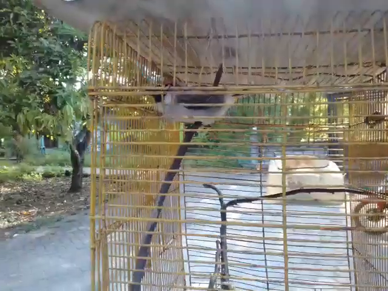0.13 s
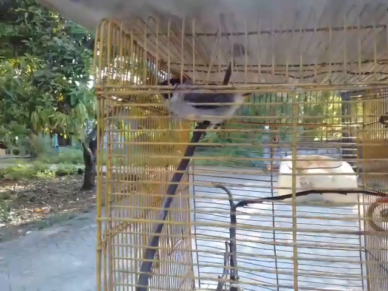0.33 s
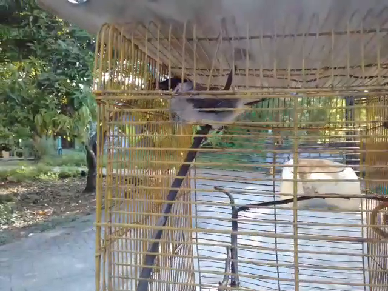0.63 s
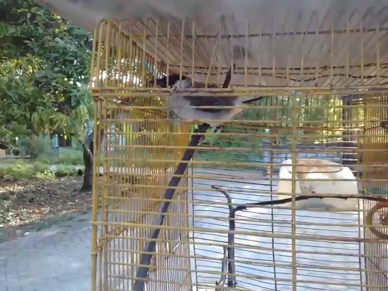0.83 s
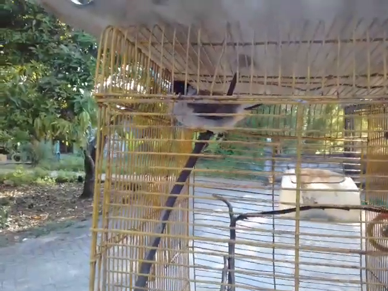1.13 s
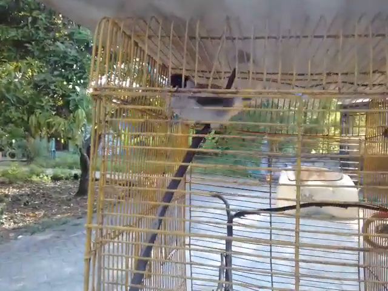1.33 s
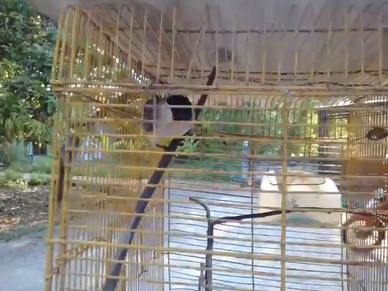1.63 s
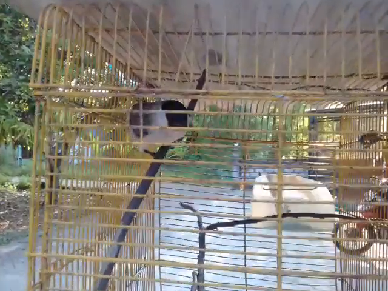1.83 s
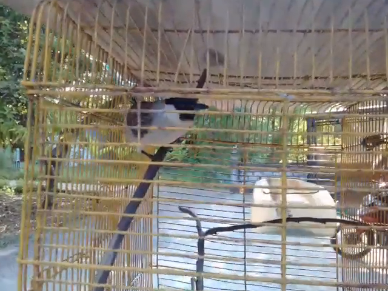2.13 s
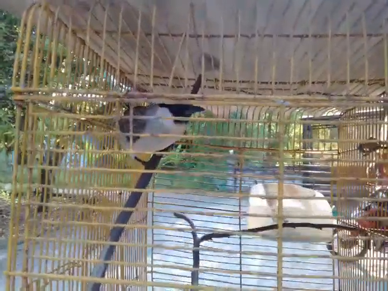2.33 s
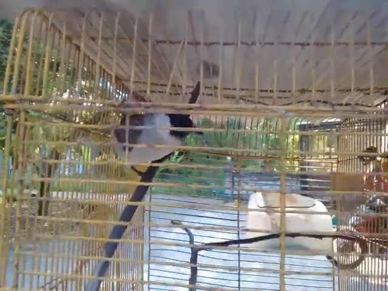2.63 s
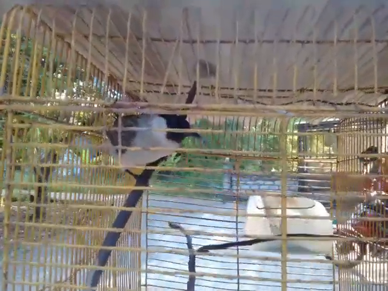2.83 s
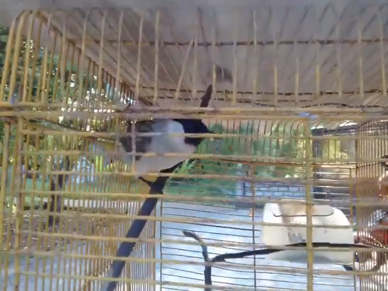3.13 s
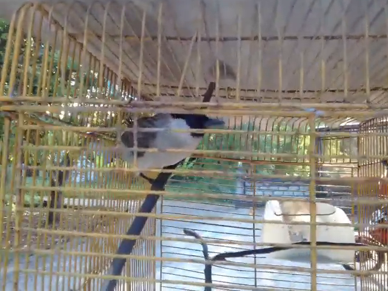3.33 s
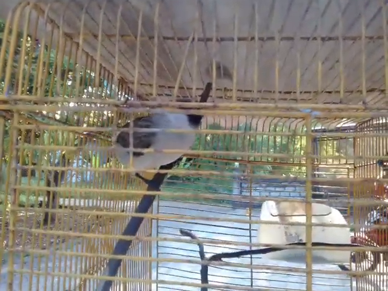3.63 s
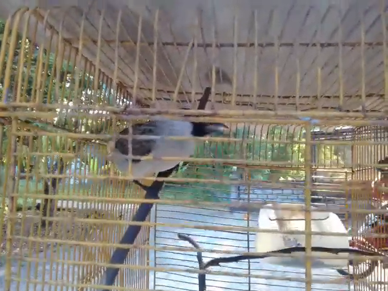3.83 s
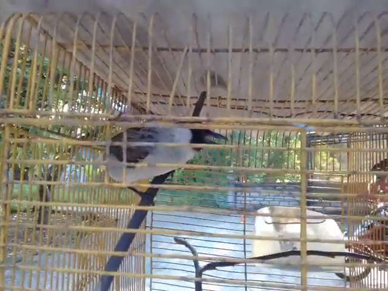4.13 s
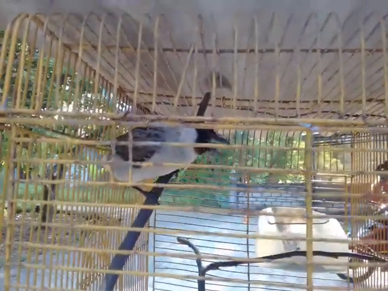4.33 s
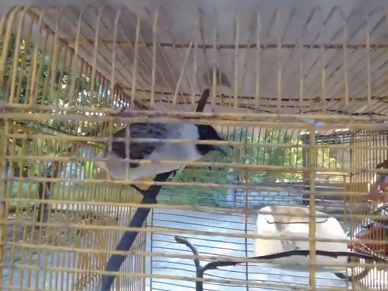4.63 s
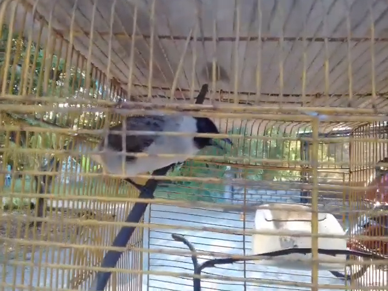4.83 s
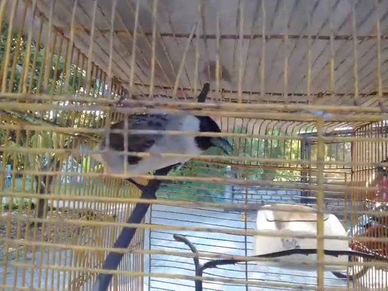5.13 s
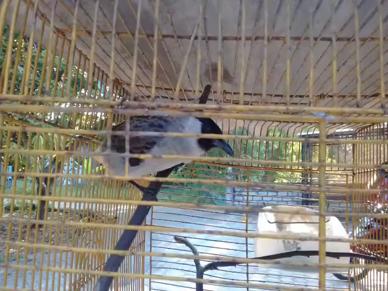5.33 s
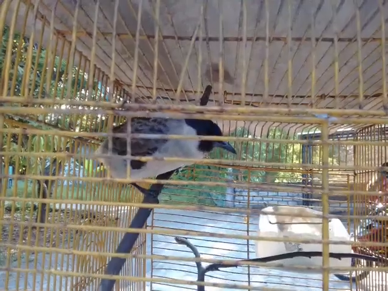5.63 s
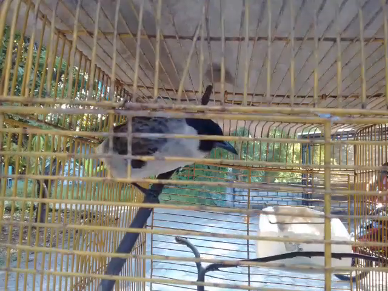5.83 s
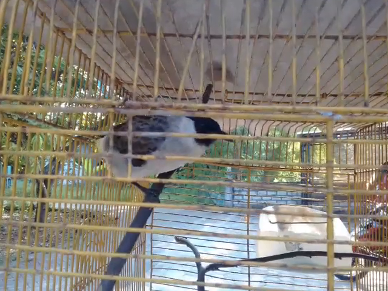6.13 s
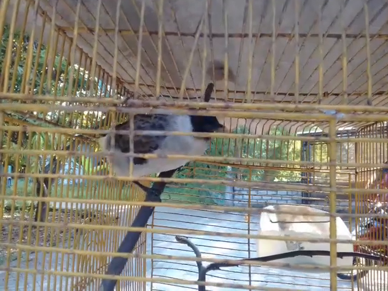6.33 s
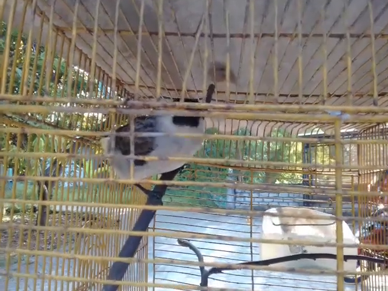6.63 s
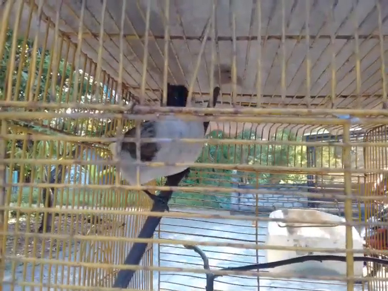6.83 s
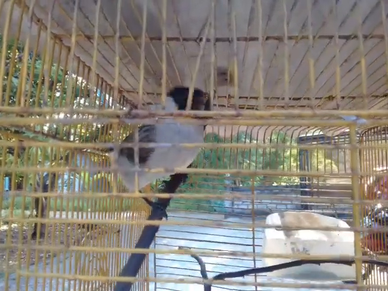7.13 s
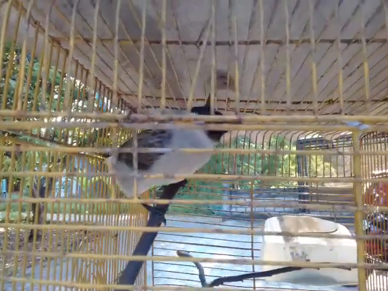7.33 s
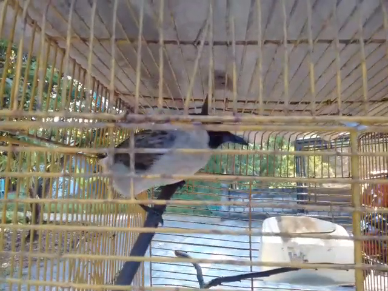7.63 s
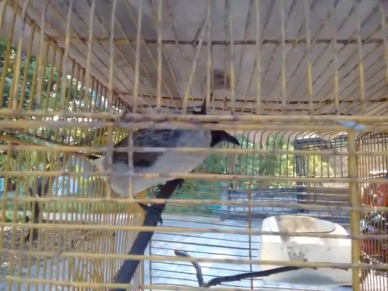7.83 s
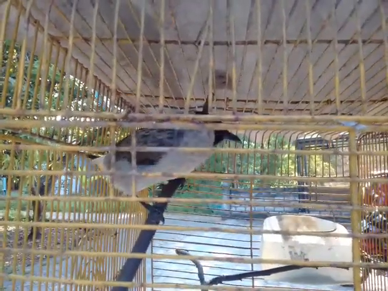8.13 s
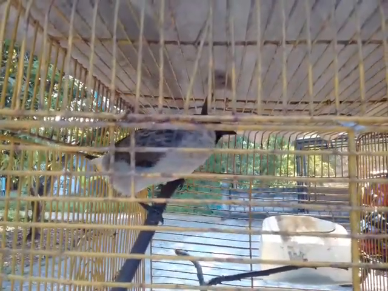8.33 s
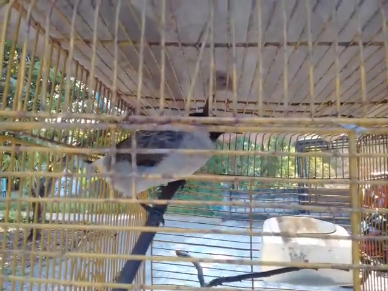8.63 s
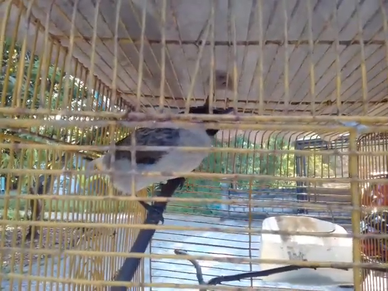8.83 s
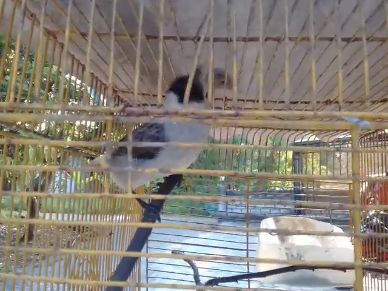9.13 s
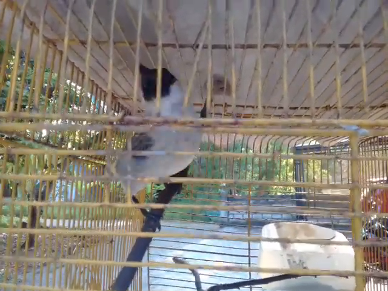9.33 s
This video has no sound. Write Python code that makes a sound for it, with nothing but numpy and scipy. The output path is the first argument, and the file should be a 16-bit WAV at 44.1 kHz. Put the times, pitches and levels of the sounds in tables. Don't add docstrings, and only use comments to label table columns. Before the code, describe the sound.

After a brief silence, a nearby caged songbird gives one soft phrase: chip, raspy warble, sliding whistle, then a leaping, falling note. Claws tick on the perch and feathers swish while far birds call. Then four loud phrases ring out in quick succession. Hops, wire pings and a quieter phrase follow, with one last soft phrase at the end. Porch and garden give a short echo; a small bright microphone adds hiss.

```python
import sys
import numpy as np
from scipy import signal
from scipy.fft import rfft, irfft, next_fast_len
from scipy.io import wavfile
from scipy.ndimage import uniform_filter1d, minimum_filter1d, map_coordinates

SR = 44100
rng = np.random.default_rng(int(sys.argv[2]) if len(sys.argv) > 2 else 0)


def persist_wave(psi):
    counts = np.round(np.clip(psi, -1, 1) * 32767).astype(np.int16)
    wavfile.write(sys.argv[1], SR, np.atleast_2d(counts).T)


def invert_db(x):
    u = np.asarray(x, float) / 20
    return 10 ** u


N = 418509

# frequency_hz, density_db
HISS_SPECTRUM = [(3530, -11), (6000, -22.5), (6710, -12), (8870, -10.5), (10700, 3.5), (11200, -1),
                 (13200, -21.5), (14400, -17), (15600, -31.5)]


def unit(x):
    return x / np.sqrt(np.mean(x ** 2) + 1e-20)


def along(points, hz):
    f, v = np.transpose(points)
    return np.interp(np.log(hz + 1), np.log(f + 1), v)


def curves(rows, smooth_s=0):
    s, *columns = np.transpose(rows)
    t = np.arange(N) / SR
    width = max(1, int(smooth_s * SR))
    return [uniform_filter1d(np.interp(t, s, column), width) for column in columns]


def wobble(rate):
    knots = rng.standard_normal(int(N * rate / SR) + 4)
    return map_coordinates(knots, [np.arange(N) * rate / SR])


def coloured(size, gain):
    m = next_fast_len(size + 2048)
    spectrum = rfft(rng.standard_normal(m)) * gain(np.fft.rfftfreq(m, 1 / SR))
    return unit(irfft(spectrum, m)[:size])


def closed(spectrum):
    return lambda hz: invert_db(along(spectrum, hz)) * (hz > spectrum[0][0] / 2)


def add(track, s, x):
    part = track[round(s * SR):][:len(x)]
    part += x[:len(part)]


def echo(x, stretch, onset):
    # frequency_hz, t60_s
    yard_decay = [(500, 0.49), (3000, 0.47), (8000, 0.31), (14000, 0.1)]
    out, hop = np.zeros(N), SR // 4
    for start in range(0, N, hop):
        hz, t, z = signal.stft(rng.standard_normal(SR // 2), SR, nperseg=256)
        t60 = stretch * along(yard_decay, hz)[:, None]
        tail = signal.istft(z * invert_db(-60 * t / t60), SR, nperseg=256)[1]
        tail = tail / np.linalg.norm(tail)
        add(out, start / SR + onset, signal.fftconvolve(x[start:start + hop], tail))
    return out


def air():
    # frequency_hz, density_db
    traffic_spectrum = [(15, -40), (25, -8), (33, -38), (64, -10), (166, -1), (375, -7.5), (500, -7.5),
                        (650, -28), (1100, -120)]
    # frequency_hz, density_db
    garden_spectrum = [(210, -32), (350, -10.5), (447, -4.5), (571, -1.5), (3570, -4), (5150, -14),
                       (6500, -17.5), (8450, -35.5), (14300, -120)]
    # time_s, level_db
    breeze = [(.4, -13), (.7, -0.5), (1.64, 3), (1.7, -1), (3.3, -0.9), (4.2, 1), (5.0, -2.5), (5.7, -5),
              (6.6, 1), (7.2, 3), (8.6, 4), (9.49, 6)]
    # time_s, level_db
    traffic_loudness = [(.4, -8), (.7, 8.5), (1.64, 10), (1.7, 1), (3.3, 2), (4.2, 1), (5.7, -2), (7.5, 4),
                        (9.49, 5.5)]
    traffic_db, garden_db, hiss_db = -67.5, -55, -53.5
    sway_db = 1.5
    breeze_db, = curves(breeze)
    traffic = invert_db(traffic_db + curves(traffic_loudness)[0] + 1.7 * wobble(4.1)) * coloured(N, closed(traffic_spectrum))
    garden = invert_db(garden_db + breeze_db + sway_db * wobble(8)) * coloured(N, closed(garden_spectrum))
    hiss_level = invert_db(hiss_db + 0.68 * breeze_db + 1.2 * wobble(18))
    return traffic + garden + hiss_level * coloured(N, closed(HISS_SPECTRUM))


def engine():
    # frequency_hz, width_hz, level_db
    engine_lines = [(190, 8, 5), (400, 12, -1), (562, 22, 5)]
    # time_s, level_db
    idle = [(.4, -102), (1.2, -58.5), (1.65, -72), (2.3, -72), (3.0, -76), (7.6, -82.5), (8.3, -62),
            (9.49, -61.5)]

    def resonances(f):
        return sum(invert_db(db) / (1 + (2 * (f - hz) / width_hz) ** 2) for hz, width_hz, db in engine_lines)

    lines = coloured(N, resonances)
    return invert_db(curves(idle)[0]) * lines


def warble(shy_db, *dips_hz):
    start_s, swing_s = -.0478, .0125
    entry_hz, crest_hz, first_dip_hz, sink_hz = 4500, 3760, 3000, 220
    crest_db, dip_db, crest_bright_db, dip_bright_db = -12, -13, -44, -23
    rows = [(start_s + 0.2 * swing_s, entry_hz + 900, crest_db - 24 + shy_db, crest_bright_db - 14),
            (start_s + 0.4 * swing_s, entry_hz - 250, crest_db - 2 + shy_db, crest_bright_db)]
    for k, dip_hz in enumerate((first_dip_hz,) + dips_hz):
        dip_s = start_s + (0.78 + k) * swing_s
        this_crest_hz = crest_hz - 150 * (k == 1)
        this_dip_db = dip_db + shy_db * (k == 0) - 2.5 * (k == 2)
        rows += [(dip_s + at * swing_s, dip_hz, this_dip_db, dip_bright_db) for at in (-.05, .06)]
        rows += [(dip_s + at * swing_s, this_crest_hz, crest_db, crest_bright_db) for at in (.44, .62)]
    return rows + [(-.003, crest_hz - sink_hz, crest_db - 3, crest_bright_db)]


def glide(start_db, place, end_db):
    # time_s, pitch_hz, tone_db, overtones_db
    whistle = [(0, 3878, -10.5, -41), (.006, 3947, -11, -33), (.02, 3894, -9.5, -44.5),
               (.035, 3790, -4.5, -30), (.048, 3710, -9.5, -42), (.054, 3680, -26.5, -53),
               (.057, 3680, -55.5, -72)]
    peak_s = whistle[3][0]
    rows = []
    for s, hz, db, bright_db in whistle:
        if s <= peak_s:
            rows.append((s * place, hz, db + start_db * (1 - s / peak_s), bright_db))
        else:
            rows.append((s, hz, db + end_db, bright_db))
    return rows


def phrases():
    # time_s from the beat, pitch_hz, tone_db, overtones_db
    lead_in = [(-.113, 4328, -42.5, -38.5), (-.109, 4326, -40.5, -34), (-.093, 4450, -20.5, -42)]
    chip = [(-.088, 3366, -17.5, -43), (-.083, 3584, -13.5, -38.5), (-.078, 3740, -11.5, -40),
            (-.071, 3950, -22, -56.5), (-.064, 3900, -45, -60)]
    soft_chip = [(-.089, 3250, -17, -43), (-.081, 3280, -16, -40), (-.077, 3900, -14, -40),
                 (-.0745, 3480, -16, -40), (-.071, 4150, -20, -50), (-.065, 3950, -42, -60)]
    low_note = [(-.07, 1900, -57.5, -67), (-.066, 1837, -29, -38), (-.052, 1741, -21.5, -31),
                (-.0405, 1770, -24.5, -33), (-.037, 2550, -21, -31)]
    scoop = [(-.052, 2040, -34, -54), (-.047, 2350, -33, -44), (-.044, 2950, -27, -34),
             (-.038, 3150, -20, -31)]
    plateau = [(-.034, 3147, -23, -21.5), (-.029, 3326, -13.5, -21.5), (-.02, 3350, -12, -17),
               (-.001, 3351, -12.5, -16.5)]
    dip = [(.0025, 2640, -13.5, -23), (.006, 2672, -6.5, -19.5)]
    arch = [(.0098, 2935, -27.5, -12.5), (.023, 2840, -22.5, -13.5)]
    fall = [(.029, 2755, -9.5, -12.5), (.035, 2680, -8, -21), (.040, 2560, -3, -27), (.0435, 2380, -5, -13)]
    bottom = [(.045, 2250, -13, -16), (.049, 1990, -12, -22), (.0525, 1950, -14, -24)]
    flick = [(.0545, 2594, -14.5, -14), (.0565, 3130, -18, -21), (.064, 3170, -15, -34),
             (.070, 3120, -24, -40), (.075, 3050, -46, -70)]
    # beat_s, pitch_factor, run_up_db, whistle_db, overtones_db
    openings = [
        (.463, 1.007, -20.5, -15, -52),
        (3.591, 1.005, -6.5, -3, -36),
        (4.056, 1.006, 0, -0.5, -6),
        (4.528, 1.02, 0, -1, 0),
        (5.071, .995, -1, -1.5, 1),
        (7.221, 0.985, -13, -9, -17),
        (9.283, .99, -10.5, -9.5, -6),
    ]
    # lead_pitch_factor, chip_late_s, chip_db, whistle_length_factor, lead_db
    quirks = [(1, 0, 0, .88, 0), (1.22, .003, 0.5, .97, 0), (.96, -.001, -.5, .96, 0),
              (1.01, -.001, -1.5, 1.06, 0), (1.02, -.007, -4, .93, 0), (1.07, 0, 3, .94, -2),
              (1.1, .003, -2, .97, -12)]
    # late_s, entry_db, second_dip_hz, third_dip_hz, rasp_0_to_1
    warbles = [(0, -16, 2950, 2600, .7), (0, -13, 2900, 2500, .8), (0, 0, 2950, 2450, .85),
               (.001, 3, 3050, 2400, .85), (0, 0, 2950, 2450, .85), (-.002, -16, 2830, 2450, .5),
               (-.002, -18, 2850, 2400, .55)]
    # start_db, peak_place_factor, end_db
    swells = [(-3, 1, 1), (-1, .96, 0), (1.5, 1, 0), (0, .9, 0), (0, 1, 0), (-5, .94, -1), (0, .64, -4)]
    # beat_s, pitch_factor, run_up_db, fall_db, length_factor
    closings = [
        (.639, 1.001, -10.5, -8.5, 0.94),
        (3.77, 1, -2.5, -4.5, 1),
        (4.234, 1.014, 0.5, -1, 1.034),
        (4.717, 0.99, -0.6, -3.5, 1.02),
        (5.266, .99, -2.5, -3.5, 1.02),
        (7.387, 0.97, -13, -10, 1.05),
        (9.456, 0.98, -12, -12, 0.97),
    ]
    # dip_db, arch_db, bottom_db, flick_db, octave_db
    stresses = [(-5, 7, -7, -13, -3), (-4, 6.5, -4, -3, 0), (2.3, -2, -3, 0, 0), (0.3, 2, -4, -1, 0),
                (-1.5, 1.5, -4, -4, 0), (-14, -1, -5, -10, -7), (-12, 4, -8, -10, 0)]
    for opening, quirk, warbling, swell in zip(openings, quirks, warbles, swells):
        s, pitch, run_db, main_db, bright_db = opening
        lead_pitch, late, chip_db, length, lead_db = quirk
        lag, shy_db, second_hz, third_hz, rasp = warbling
        yield lead_in, s + late, lead_pitch, 1, 1.6 * run_db + lead_db, 2.1 * run_db - 6, -22, .2, -1
        chip_shape = soft_chip if run_db < -9 else chip
        yield chip_shape, s + late, pitch, 1, 1.52 * run_db + chip_db, 1.0 * run_db, -16.5, .9, -4
        swings = warble(shy_db, second_hz, third_hz)
        yield swings, s + lag, 1, 1, run_db, 1.3 * run_db, -18.5 + .4 * run_db, rasp, -8
        yield glide(*swell), s, pitch, length, main_db, bright_db, -9.5, .06, -18
    for k, (closing, stress) in enumerate(zip(closings, stresses)):
        s, pitch, run_db, main_db, length = closing
        dip_db, arch_db, bottom_db, flick_db, octave_db = stress
        if k == 5:
            yield scoop, s, pitch, 1, run_db, run_db, -30, .1, -6
        else:
            yield low_note, s, pitch, 1, 0.54 * run_db, 0.92 * run_db, -26, .15, -22
        yield plateau, s, pitch, 1, run_db, 1.5 * run_db, -35, .04, -17
        yield dip, s, pitch, length, dip_db, 1.2 * run_db, -22 + octave_db, .2, -19
        yield arch, s, pitch, length, arch_db, 1.42 * run_db, -22 + octave_db, .2, -16
        yield fall, s, pitch, length, main_db, 1.2 * run_db, -22 + octave_db, .12, -19
        yield bottom, s, 1, length, bottom_db, 1.2 * run_db, -22 + octave_db, .3, -19
        yield flick, s, pitch, length, flick_db, 1.4 * run_db, -20 + octave_db, .6, -12


def voice(hz, tone_db, octave_db, upper_db, half_db):
    # frequency_hz,
    # level_db
    beak = [(1500, -28.5), (5000, -32), (8000, -38.5), (9800, -7), (11300, 6.5), (12500, -4.5), (14000, -8),
            (16000, -22)]
    turn = 2 * np.pi * np.cumsum(hz) / SR
    out = invert_db(tone_db) * (np.sin(turn) + invert_db(1.9 * half_db - 14) * np.sin(turn / 2))
    out += invert_db(octave_db) * (np.sin(2 * turn) + invert_db(half_db - 2.5) * np.sin(3 * turn / 2))
    for order in np.arange(5, 17) / 2:
        level = upper_db + along(beak, order * hz) + half_db * (order % 1 > 0) - 4.5 * (order - 4)
        out += invert_db(level) * (order * hz < 15700) * np.sin(order * turn + order)
    return np.sqrt(2) * out


def song():
    rows, beak_open = [], np.zeros(N)
    for shape, beat, pitch, length, db, bright_db, octave_offset_db, rasp, half_db in phrases():
        opens = round((beat + length * shape[0][0] - .005) * SR)
        closes = round((beat + length * shape[-1][0] + .006) * SR)
        beak_open[opens:closes] = 1
        for s, hz, t, h in shape:
            tone_db, upper_db = db + t, bright_db + h
            octave_db = 0.45 * tone_db + 0.42 * upper_db + octave_offset_db
            rows.append((beat + length * s, pitch * hz, tone_db, octave_db, upper_db, rasp, half_db))
    hz, tone_db, octave_db, upper_db, rasp, half_db = curves(sorted(rows), smooth_s=.001)
    throat_db = -4 * rasp * np.abs(hz - 3400) / 600
    tone_db = tone_db + throat_db + 4.5 * rasp * np.minimum(wobble(300), .7)
    hz = hz * (1 + .028 * rasp ** 2 * wobble(500))
    octave_db = octave_db + 4 * rasp * wobble(300)
    upper_db = upper_db + 6 * rasp * wobble(370)
    sound = voice(hz, tone_db, octave_db, upper_db, half_db)
    flutter_hz = 309.7 * (1 + 0.41 * wobble(90))
    flutter = np.sin(2 * np.pi * np.cumsum(flutter_hz) / SR)
    sound = sound * uniform_filter1d(beak_open, 120) * (1 + .45 * rasp * flutter)
    throat_hz, throat_q, ring_db = 3390, 17.4, 10.5
    throat = signal.iirpeak(throat_hz, throat_q, SR)
    return sound + invert_db(ring_db) * signal.lfilter(*throat, sound * rasp ** 1.4)


def porch(bird):
    # frequency_hz, width_hz, level_db
    hollows = [(2640, 100, -6.5), (3325, 44, -2), (3790, 310, -3)]
    # delay_s, level_db
    walls = [(.0031, -22.5), (.0062, -22.5), (.008, -12.5), (0.0107, -19.5), (.019, -26.5)]
    # start_s, end_s, level_db
    turned = [
        (.64, .75, 7),
        (7.1, 7.5, 0),
        (9.46, 9.49, 5),
    ]
    ring = sum(invert_db(db) * signal.lfilter(*signal.iirpeak(hz, hz / width_hz, SR), bird)
               for hz, width_hz, db in hollows)
    t = np.arange(N) / SR
    thrown = bird * invert_db(sum(db * (t > start) * (t < end) for start, end, db in turned))
    reflections = sum(invert_db(db) * np.pad(thrown, (round(s * SR), 0))[:N] for s, db in walls)
    return bird + ring + reflections


def swishes():
    # start_s, length_s, from_hz, to_hz, level_db
    brushes = [
        (0.78, .1, 4660, 6300, -44.5),
        (1.133, .03, 4960, 4660, -47),
        (1.266, 0.17, 4236, 4970, -42),
        (2.771, .06, 4300, 4400, -58),
        (6.146, .105, 4480, 6190, -49.5),
        (6.273, 0.074, 6110, 3630, -44),
        (6.567, .12, 5070, 5440, -50),
        (8.319, 0.072, 4160, 4260, -57),
    ]
    core_width, core_db = 0.07, -5
    out = np.zeros(N)
    for s, length, from_hz, to_hz, db in brushes:
        u = np.linspace(0, 1, int(length * SR))

        def band(width, at):
            return coloured(2 * len(u), lambda f: 1 / (1 + (2 * (f / from_hz / at - 1) / width) ** 2))

        core = band(core_width, 0.91) + invert_db(2.5) * band(core_width, 1.12)
        body = band(0.47, 0.95) + invert_db(core_db) * core
        body = map_coordinates(body, [np.cumsum(1 + (to_hz / from_hz - 1) * u)])
        edge = invert_db(-1.0) * coloured(len(u), closed(HISS_SPECTRUM))
        add(out, s, invert_db(db) * np.sin(np.pi * u ** 0.82) * (body + edge))
    return out * invert_db(1.6 * wobble(70))


def cage():
    # start_s, peak_db, wood_db
    knocks = [(1.1544, -33, -11), (1.2065, -35, -34), (1.2301, -28.5, -31), (1.4965, -22.5, -40),
              (1.7544, -32, -9), (1.8397, -36.5, -32), (1.8991, -32.5, -32), (2.0614, -30, -23),
              (2.2223, -35, -31), (2.4728, -32.5, -34), (3.04, -45.5, -5.5), (3.1462, -36, -27),
              (3.2094, -59, 10), (3.2934, -32.5, -39), (3.4094, -56, 12), (5.5837, -34.5, -32),
              (5.9983, -23, -48), (6.5091, -31.5, -33), (6.6363, -25, -15.5), (6.8753, -15, -19.5),
              (6.9122, -9.5, -20.5), (7.7977, -27.5, -8), (7.863, -21.5, -15), (7.9084, -6.5, -16.5),
              (8.2172, -40, -21), (8.2646, -35, -8)]
    # start_s, peak_db, wood_db
    landings = [
        (3.455, -21.5, -10),
        (5.478, -16, -16),
        (5.798, -22, -12.5),
        (6.9, -11.5, -10.5),
        (7.92, -15.5, -5),
    ]
    # frequency_hz, density_db
    wood_spectrum = [(150, -60), (250, -22.5), (358, -16.5), (1110, 0.5), (1410, -3.5), (1890, -1.5),
                     (3300, -5), (6000, -19.5), (7800, -42.5), (13200, -120)]
    # frequency_hz, density_db
    snap_spectrum = [(2500, -10), (5000, -5), (7500, -10), (10500, 7.5), (13000, -4.5), (15800, -23)]
    # start_s, pitch_hz, level_db, t60_s,
    # tuning_spread if wide
    wires = [(5.996, 4100, -42, .05, .04), (6.0, 4600, -46, 0.25, .035), (3.25, 550, -56, .15, .03),
             (4.44, 550, -58, .15, .03), (5.22, 550, -58, .15, .03), (7.91, 1118, -44, 0.25),
             (7.91, 2050, -47, 0.16), (6.01, 5520, -53, .35, .012), (5.998, 9110, -37, 0.16),
             (5.998, 10000, -44, 0.31), (5.998, 10800, -54, .16), (5.999, 13600, -64, .4),
             (6.645, 13430, -38, 0.26), (7.478, 5340, -44, 0.05, .02), (7.478, 10810, -39, 0.056),
             (7.522, 13600, -32, 0.16), (7.58, 13400, -43, 0.32), (7.59, 14000, -52, .3)]
    out, t = np.zeros(N), np.arange(SR // 3) / SR
    for contacts, rise_s, t60 in [(knocks, .0012, 0.073), (landings, .009, 0.1)]:
        for s, db, wood_db in contacts:
            snap = invert_db(-60 * t / (0.7 * t60)) * coloured(len(t), closed(snap_spectrum))
            wood = invert_db(wood_db + 11.5 - 60 * t / t60) * coloured(len(t), closed(wood_spectrum))
            add(out, s, invert_db(db - 7) * (1 - np.exp(-t / rise_s)) ** 2 * (snap + wood))
    for s, hz, db, t60, *spread in wires:
        width_hz = max([.004, *spread]) * hz
        bundle = coloured(len(t), lambda f: 1 / (1 + ((f - hz) / width_hz) ** 2))
        add(out, s, invert_db(db + 1.5 - 60 * t / t60) * (1 - np.exp(-t / 0.00055)) * bundle)
    return out


def note(length, from_hz, to_hz, db, upper_db, bow=.75, early=.8):
    u = np.linspace(0, 1, int(length * SR))
    swell = np.sin(np.pi * u ** early) ** .6
    bend = np.sin(np.pi / 2 * np.minimum(u / bow, 1)) if bow < .7 else u ** bow
    return swell * voice(from_hz + (to_hz - from_hz) * bend, db, upper_db - 15, upper_db, half_db=-46)


def far_birds():
    # start_s, length_s, from_hz, to_hz, level_db, bow if
    far_calls = [(1.315, .035, 4380, 4220, -46), (1.33, .055, 4300, 5400, -45),
                 (1.485, .03, 3960, 3880, -52), (1.475, .015, 3050, 2950, -55),
                 (1.52, .04, 2300, 3400, -54), (1.55, .04, 3500, 3100, -55), (1.64, .04, 2850, 2750, -58),
                 (1.665, .035, 3600, 3050, -55), (1.692, .022, 2800, 2420, -48),
                 (1.71, .045, 3250, 3100, -52), (1.735, .025, 2900, 2764, -49),
                 (1.795, .04, 6280, 6220, -55), (1.835, .05, 6350, 6800, -59),
                 (1.81, .055, 2480, 2290, -46, .55), (1.812, .12, 9420, 10220, -48.5),
                 (2.28, .1, 7100, 6800, -66.5), (2.295, .08, 3750, 3600, -53), (2.3, .07, 3220, 3230, -55),
                 (2.43, .05, 2360, 2480, -54), (2.58, .04, 3750, 3900, -56), (2.63, .08, 3900, 3880, -61),
                 (2.67, .05, 2950, 2900, -52), (2.705, .14, 2336, 2465, -48), (2.71, .03, 2150, 2100, -55),
                 (2.76, .06, 2720, 2680, -52), (2.86, .03, 4080, 4080, -56), (2.94, .065, 3640, 3580, -46),
                 (2.968, .05, 3120, 3300, -50), (3.03, .075, 3890, 3450, -44), (3.06, .03, 3800, 3780, -50),
                 (5.68, .077, 6670, 6600, -69.5), (6.372, .045, 2640, 2290, -59),
                 (6.465, .045, 2750, 2200, -51), (6.84, .022, 4300, 3400, -50),
                 (6.862, .014, 2850, 2750, -44), (7.88, .04, 3600, 3380, -40), (8.05, .05, 3650, 3150, -44),
                 (7.74, .05, 2750, 2350, -52), (8.39, .035, 2850, 2610, -53), (8.425, .06, 3720, 3480, -44),
                 (8.7, .07, 2900, 2880, -49), (8.765, .025, 2950, 2550, -45), (8.82, .06, 3640, 3330, -45)]
    # offset_s, length_s, from_hz, to_hz, level_db
    answer = [(-.11, 0.0704, 3540, 3402, -11), (0, 0.073, 3062, 2923, -3), (0.064, 0.0573, 3570, 3146, -6),
              (.105, 0.086, 3054, 3000, -2.5), (.2, 0.09, 3007, 2895, -17)]
    # start_s, length_factor, pitch_factor, level_db
    answers = [
        (2.383, 1, 1, -38),
        (7.478, 0.96, 1.014, -39.5),
        (8.002, 1.03, 1.001, -39.5),
        (8.525, 1.15, .972, -40),
    ]
    calls = list(far_calls)
    for s, pace, pitch, db in answers:
        for at, length, from_hz, to_hz, level in answer:
            calls.append((s + pace * at, pace * length, pitch * from_hz, pitch * to_hz, db + level))
    out, t = np.zeros(N), np.arange(N)
    for s, length, from_hz, to_hz, db, *bow in calls:
        add(out, s, note(length, from_hz, to_hz, db, -120, *bow, early=.65))
    steady = map_coordinates(out, [t + 3.2 * wobble(60)]) * invert_db(3.2 * wobble(70))
    trill = map_coordinates(out, [t + 12 * wobble(90) + 3 * wobble(250)])
    direct = invert_db(-3) * (steady + invert_db(-8) * trill)
    return direct + invert_db(-1) * echo(steady + invert_db(-1.5) * trill, stretch=.95, onset=.003)


def peeps():
    # start_s, length_s, from_hz, to_hz, level_db, overtones_db, bow if arched
    whistles = [
        (3.93, .012, 5700, 5000, -52, -80),
        (4.405, .02, 5300, 6700, -57, -80),
        (4.932, .018, 5400, 6400, -55, -80),
        (4.95, .01, 6300, 5300, -56, -80),
        (6.987, .046, 1880, 2212, -30.5, -60, .5),
        (7.098, .012, 3900, 4400, -47, -80),
        (8.69, .048, 5200, 6150, -53, -80),
        (8.815, .072, 6420, 5520, -37.5, -40),
        (9.077, .038, 1880, 2215, -33.5, -42, .55),
        (9.152, .016, 3950, 4550, -49, -80),
    ]
    # start_s, length_s, from_hz, to_hz, level_db, overtones_db, bow
    squeak = (5.994, .024, 3500, 5650, -43, -70, .5)
    out = np.zeros(N)
    for s, *call in whistles + [squeak]:
        add(out, s, note(*call))
    return out


def scene():
    bird, calls, things = song(), peeps(), cage() + swishes()
    near = invert_db(-2.5) * porch(bird)
    wet = echo(invert_db(-20) * bird + invert_db(-20.5) * calls, stretch=1.04, onset=.012)
    wet = wet + invert_db(-6.5) * echo(things, stretch=1.0, onset=0.0055)
    return (near + calls + things + wet + far_birds() + engine() + air())[None]


def band_limit(x):
    return signal.sosfilt(signal.butter(12, 15730, fs=SR, output="sos"), x)


def record(dry):
    start_s, fade_s = 0.39, .045
    fade = np.clip((np.arange(N) / SR - start_s) / fade_s, 0, 1) ** 1.5
    lowpass = signal.ellip(10, .5, 60, 15600, fs=SR, output="sos")
    x = signal.sosfilt(lowpass, dry * fade)
    gain = minimum_filter1d(np.minimum(1, .9 / (np.abs(x) + 1e-9)), 200)
    mix = x * uniform_filter1d(gain, 100) - 0.00054 * fade
    return band_limit(mix)


dry = scene()
out = record(dry)
persist_wave(out)
```